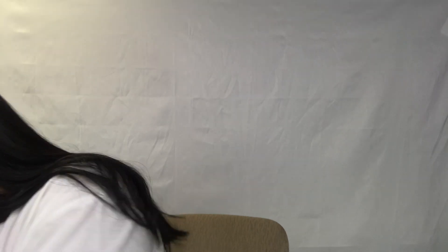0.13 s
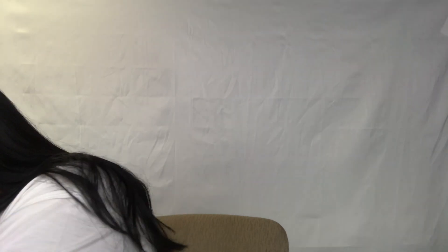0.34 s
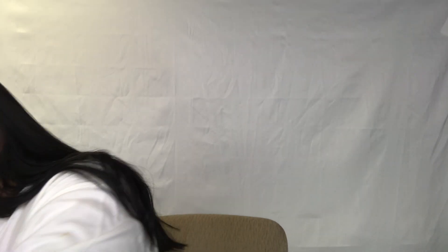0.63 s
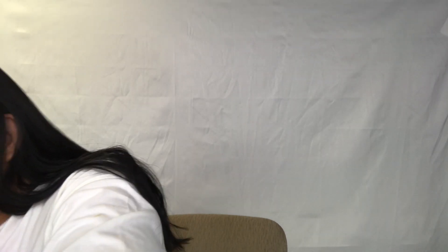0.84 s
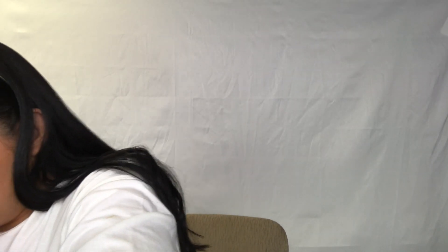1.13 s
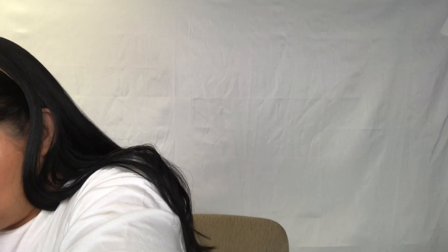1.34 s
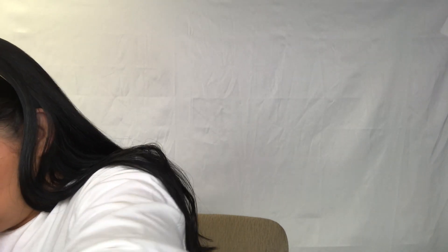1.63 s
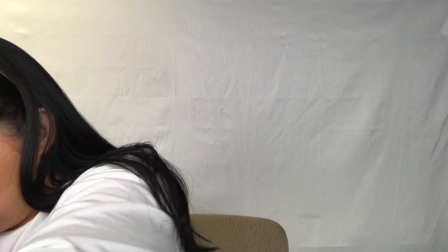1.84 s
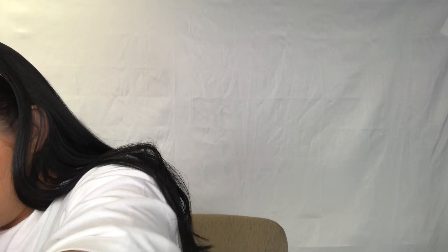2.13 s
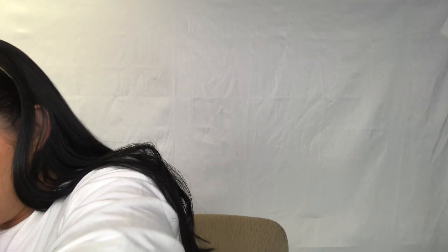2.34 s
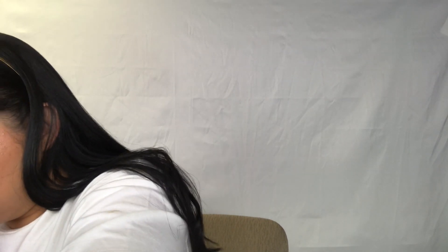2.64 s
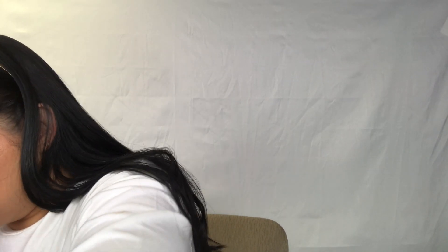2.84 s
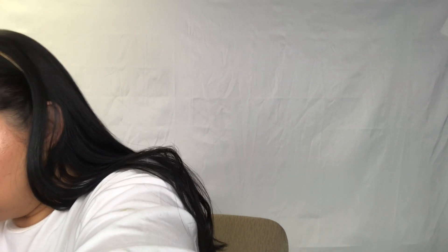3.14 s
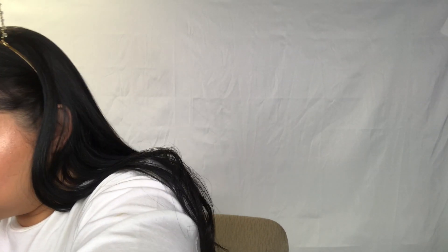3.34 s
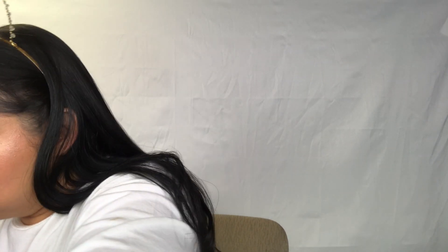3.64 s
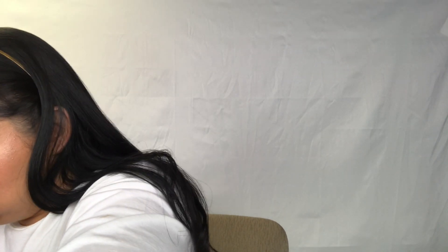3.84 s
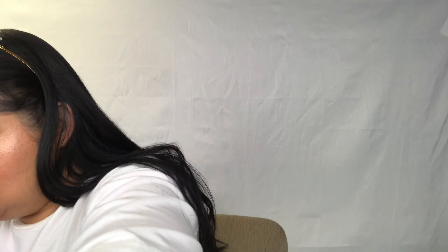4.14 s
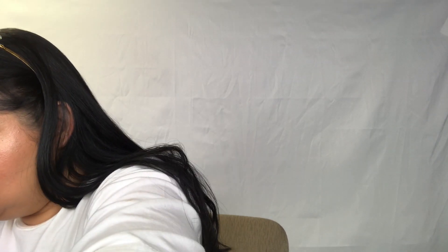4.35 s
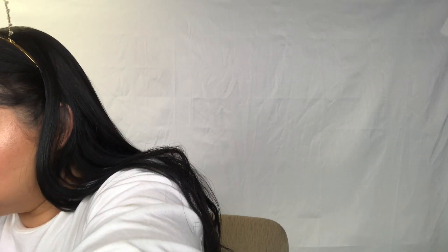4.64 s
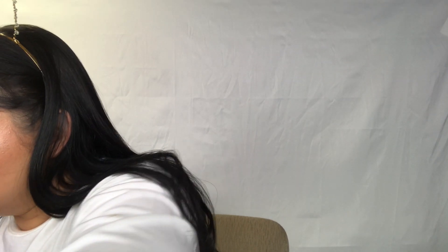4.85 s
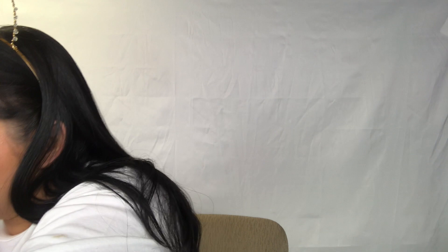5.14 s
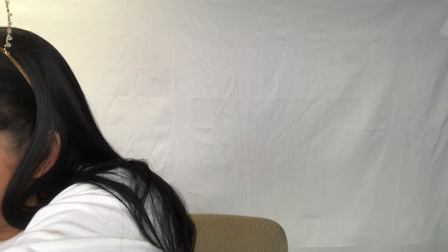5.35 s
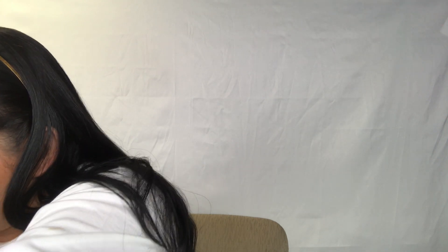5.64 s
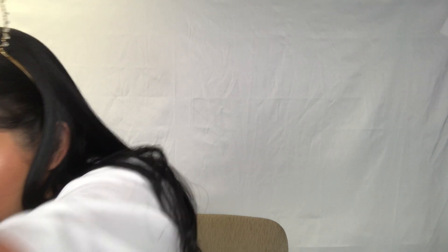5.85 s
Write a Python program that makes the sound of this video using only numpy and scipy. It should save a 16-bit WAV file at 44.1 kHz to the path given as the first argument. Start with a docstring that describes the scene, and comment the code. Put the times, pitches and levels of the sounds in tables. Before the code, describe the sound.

In a small, slightly echoing room, light plastic containers knock together, slide with brief dry chatter and land on a tabletop. The busiest and loudest rattle comes about a third of the way through; later contacts are sparser and softer, with a scratchy slide and low furniture bumps near the end. Low, steady air noise runs underneath, and the microphone is nearby.

```python
"""On a table in a small room, small plastic makeup cases are rummaged through, slid about and set down.
Each contact thuds in the table, rings the hollow case and its lid, and ticks at the hard edge.
Sliding cases chatter in random tiny slips, with a dry edge hiss; a few soft bumps boom in the furniture.
A diffuse tail and a floor-to-ceiling flutter follow every sound, over nearly steady ventilation noise."""
import sys
import numpy as np
from scipy import signal
from scipy.fft import rfft, irfft
from scipy.io import wavfile
from scipy.ndimage import uniform_filter1d

SR = 44100
rng = np.random.default_rng(int(sys.argv[2]) if len(sys.argv) > 2 else 0)


def to_wav(sig):
    """Store sig (one row per channel, or 1-D mono) as 16-bit WAV at the path in sys.argv[1].

    Samples outside -1..1 are clipped; the rate is SR.
    """
    pcm = np.clip(np.atleast_2d(sig), -1, 1) * 32767
    pcm = np.round(pcm).astype(np.int16)
    wavfile.write(sys.argv[1], SR, pcm.T)  # frames by channels


N = 264451
T = np.arange(N) / SR
RING_T = T[:SR // 3]

LEAD_IN_S = 0.012  # faint noise swells for this long before each impact
IMPACT = int(LEAD_IN_S * SR) + SR // 2000  # sample index of the impact
CASE_HZ, RESTING_CASE_HZ = 790, 583  # a case rings lower when it stands on the table
THUD_HZ = 329.4  # the table's answer to a blow in the pile of cases
EDGE_HZ, EDGE_T60_S = 4000, 0.025  # the faint tick that goes with a flat blow


def undb(db):
    """Decibels to gain."""
    return 10 ** (np.asarray(db) / 20)


def unit(x):
    """Scale to an rms of one."""
    return x / np.sqrt(np.mean(x ** 2))


def blow(x):
    """Scale a short sound to the energy of 10 ms at an rms of one."""
    return x / np.sqrt(np.sum(x ** 2) / (SR * 0.01))


def fade(t, t60_s):
    """Exponential decay, 60 dB down at t60_s."""
    return np.exp(-np.log(1000) * t / np.maximum(t60_s, 1e-4))


def add(out, start_s, x):
    """Mix x into out from start_s."""
    i = int(np.clip(start_s * SR, 0, N - 1))
    out[i:i + len(x)] += x[:N - i]


def colour(x, points):
    """Minimum-phase filter through (Hz, dB) points, built from the cepstrum of the log gain."""
    hz, db = np.transpose(points)
    size = 4096
    f = np.maximum(np.arange(size // 2 + 1) * SR / size, 1)
    gain = undb(np.interp(np.log(f), np.log(hz), db))
    cepstrum = irfft(np.log(gain))
    # fold onto positive time to make the response causal
    cepstrum[1:size // 2] *= 2
    cepstrum[size // 2 + 1:] = 0
    impulse_response = irfft(np.exp(rfft(cepstrum)))
    return signal.fftconvolve(x, impulse_response)[:len(x)]


def ring(modes):
    """Sum of exponentially damped sine modes (Hz, dB, t60 s), scaled as one blow."""
    total = np.zeros(len(RING_T))
    for hz, db, t60_s in modes:
        total += undb(db) * np.sin(2 * np.pi * hz * RING_T) * fade(RING_T, t60_s)
    return blow(total)


def resonate(x, hz, q):
    """Two-pole resonance at hz with quality q."""
    b, a = signal.iirpeak(np.clip(hz, 30, SR / 3), max(q, 0.8), fs=SR)
    return signal.lfilter(b, a, x)


def shell(force, hz, spread, q):
    """A heavily damped pair of resonances either side of hz, with a steep fall beyond them."""
    pair = resonate(resonate(force, hz / spread, q), hz * spread, q)
    band_hz = [hz * 0.48, min(hz * 1.45, SR / 3)]
    sos = signal.butter(3, band_hz, "bandpass", fs=SR, output="sos")
    return blow(signal.sosfilt(sos, pair))


def contact(chatter_db, chatter_t60_s):
    """Excitation of one contact: a faint noise lead-in, a sharp impact, then a brief noisy chatter."""
    size = len(RING_T)
    after_s = np.maximum(RING_T - LEAD_IN_S, 0)
    lead_in = blow(rng.standard_normal(size) * RING_T * (after_s == 0))
    swell = 1 - fade(after_s, 0.0024)
    chatter = blow(rng.standard_normal(size) * swell * fade(after_s, chatter_t60_s))
    impact = blow(signal.unit_impulse(size, IMPACT))
    return impact + undb(chatter_db) * chatter + undb(-17) * lead_in


def edge_tick(hz, t60_s, grit_db):
    """A close pair of edge modes rings from the instant of impact, with gritty noise beside it."""
    # spectrum of the grit: (frequency [Hz], relative level [dB])
    grit_spectrum = [(700, -55), (2000, -32), (3400, -14.5), (4700, 7), (7000, 2), (9000, -5),
                     (10500, -12.5), (12500, -8), (16000, -24)]
    pair = ring([(hz * 0.985, 0, t60_s), (hz * 1.03, -3, t60_s)])
    delayed = np.pad(pair, (IMPACT, 0))[:len(pair)]
    ping = blow(resonate(delayed, hz, 8.9))
    grit = blow(colour(contact(chatter_db=33, chatter_t60_s=0.0077), grit_spectrum))
    return blow(ping + undb(grit_db) * grit)


def knock(thud_db, body_db, lid_db, edge_db, chatter_db, grit_db,
          thud_hz=THUD_HZ, body_hz=CASE_HZ, edge_hz=EDGE_HZ, edge_t60_s=EDGE_T60_S):
    """One excitation drives case, lid and, slightly late, table; the hard edge ticks at impact."""
    force = contact(chatter_db, chatter_t60_s=0.024)
    thud_lag = int(0.0014 * SR)
    thud = shell(force, thud_hz, spread=0.81, q=1.99)
    thud = np.pad(thud, (thud_lag, 0))[:len(force)]
    body = shell(force, body_hz, spread=1.18, q=1.7)
    lid_hz = 2180 * (1 + 0.018 * rng.standard_normal())  # lids clack at much the same pitch
    lid = shell(force, lid_hz, spread=1.018, q=3.05)
    edge = edge_tick(edge_hz, edge_t60_s, grit_db)
    return undb(thud_db) * thud + undb(body_db) * body + undb(lid_db) * lid + undb(edge_db) * edge


def knocks():
    """Knocks of hollow cases, and one room echo: each has its own pitch; the edge tick follows the lid."""
    # (time [s], case level [dB], case pitch [Hz], lid clack [dB re case], table thud [dB re case])
    # the row at 0.879 s reinforces a room echo of the snap at 0.8445 s
    events = [(0.033, -30, 760, -15, -7), (0.087, -34, 700, -10, -5), (0.479, -15.5, 840, -13.5, -38),
              (0.511, -20.5, 770, -3.5, -6), (0.539, -25, 1010, -3, -1), (0.799, -25.5, 766, 2, -12),
              (0.8151, -16.5, 813, -22, -6), (0.826, -28.5, 800, 2, -12), (0.879, -28.5, 700, -13, 1.5),
              (1.065, -34, 580, -18, -5.5), (1.3064, -25.5, 1265, -6, -32), (1.308, -24, 674, -38, -11.5),
              (1.4934, -36.5, 1350, -3, -4), (1.495, -28.5, 537, -20, -6), (1.799, -27, 990, -0.5, -12),
              (1.9685, -15.5, 700, -12, -17), (1.978, -12, 760, -11, -18.5), (1.999, -14.5, 915, -4, -20),
              (2.03, -15.5, 735, -21, -22), (2.051, -37, 910, -24, 0), (2.056, -12.5, 886, -22, -7.5),
              (2.065, -18, 800, -7.5, -9), (3.68, -27.5, 900, -3.5, -9), (3.695, -21, 920, -10, -24),
              (3.708, -23.5, 850, -22, -10), (3.8354, -22, 910, -7, -10), (3.856, -21, 796, -4.5, -6.5),
              (3.924, -32, 890, -2.5, 1.5), (3.994, -37, 1010, 2, -3), (4.157, -46.5, 660, -1, -16),
              (5.278, -26.5, 700, -25, 0), (5.417, -37.5, 890, -6, -1), (5.497, -37.5, 920, -13, 4),
              (5.703, -38, 590, -8, -11)]
    out = np.zeros(N)
    for time_s, case_db, case_hz, lid_re_db, thud_re_db in events:
        lid_db = case_db + lid_re_db
        # lighter contacts chatter more
        sound = knock(case_db + thud_re_db, case_db, lid_db, lid_db - 17,
                      chatter_db=-2 - 0.1 * case_db, grit_db=0, body_hz=case_hz)
        add(out, time_s - LEAD_IN_S, sound)
    return out


def set_downs():
    """Cases land or rock on the table: the tabletop thuds under the resting case and its lid."""
    # (time [s], thud level [dB], thud pitch [Hz], hollow body [dB re thud], lid clack [dB re thud])
    events = [(1.7443, -25.5, 390, -17, 5.5), (1.763, -25.5, 400, -0.5, -10), (1.773, -34, 382, -6, -18),
              (1.791, -18, 382, -9, -10.5), (1.803, -23.5, 264, -1.5, -7), (1.836, -22, 253, -6, -36),
              (1.852, -33, 231, -3, -29), (2.292, -21, 274, -9, -11), (2.312, -24, 333, -19, -34),
              (2.339, -25, 262, -9.5, -37), (2.372, -34.5, 213, 1, -6), (2.498, -39, 174, -0.5, -15),
              (2.704, -22, 233, 2, -31), (2.755, -42, 225, -20, -11), (2.878, -39, 236, -8, -13),
              (3.133, -42, 194, 2.5, -10), (3.708, -31.5, 197, -4, 2), (3.7631, -27, 350, -3, -4),
              (4.733, -39, 148, 9, -4), (4.764, -39.5, 149, -4, -6.5), (5.676, -38.5, 301, 1.5, -17),
              (5.764, -37, 218, -21, -24), (5.867, -28.5, 330, -11, -17), (5.923, -35, 223, -14, -25)]
    out = np.zeros(N)
    for time_s, thud_db, thud_hz, body_re_db, lid_re_db in events:
        lid_db = thud_db + lid_re_db
        sound = knock(thud_db, thud_db + body_re_db, lid_db, lid_db - 23.5,
                      chatter_db=1 - 0.1 * thud_db, grit_db=6, thud_hz=thud_hz, body_hz=RESTING_CASE_HZ)
        add(out, time_s - LEAD_IN_S, sound)
    return out


def clicks():
    """Snaps of hard edges, and one room echo: a bright ping with grit, over lid, case and table."""
    # (time [s], edge level [dB], edge pitch [Hz], ring t60 before the edge resonance [s],
    #  case behind the edge [dB re edge], grit [dB re ping])
    # the row at 0.877 s reinforces a room echo of the snap at 0.8445 s
    events = [(0.01, -53.5, 7800, .012, 14.5, 3), (0.5306, -32, 5470, 0.0065, 8, 2),
              (0.5743, -39.5, 6370, 0.0069, -1, 1), (0.792, -25.5, 6960, 0.017, 8, 1.5),
              (0.8445, -23, 5290, 0.018, -0.5, -0.5), (0.877, -30, 5210, 0.022, 4, -19),
              (1.307, -40, 4090, 0.017, 6.5, -27), (1.7715, -34, 6100, 0.0036, 3, -8),
              (1.7864, -32.5, 5030, .008, 4, 12), (1.948, -37.5, 3180, 0.022, 4, -23),
              (1.969, -43, 4060, .012, -4, 14), (1.9916, -19.5, 4580, 0.044, -0.5, 4),
              (2.005, -26, 4770, 0.054, 6.5, 14), (2.05, -36, 7500, 0.011, 0, -2),
              (3.679, -38.5, 6050, 0.014, 10, -4), (3.857, -42, 7170, .01, 11, 1),
              (5.142, -38.5, 7100, 0.049, 3, -11), (5.163, -36, 6700, .012, 11, 8),
              (5.207, -39, 4370, .013, 2, -16), (5.23, -42, 5560, .013, 1, -12),
              (5.245, -37.5, 4800, 0.0091, -7, -17), (5.514, -45.5, 3900, .012, 3, 2),
              (5.831, -44.5, 5060, .012, -4, 15)]
    out = np.zeros(N)
    for time_s, edge_db, edge_hz, t60_s, case_re_db, grit_db in events:
        behind_db = edge_db + case_re_db
        sound = knock(behind_db - 10.5, behind_db - 5, behind_db, edge_db,
                      chatter_db=1.5, grit_db=grit_db, edge_hz=edge_hz, edge_t60_s=t60_s)
        add(out, time_s - LEAD_IN_S, sound)
    return out


def friction(t, slips_per_s, hiss_db, tilt_db_per_octave):
    """Uneven tiny slips at random instants ring the cases; their sharp edges add a dry hiss."""
    # case and edge spectra: (frequency [Hz], relative level [dB])
    rub_spectrum = [(40, -75), (100, 0.5), (150, -9), (300, -4), (420, 3), (600, 6), (1150, -2), (1450, -1),
                    (2000, -2.5), (2600, -2), (3400, -21), (6000, -53.5)]
    scrape_spectrum = [(1500, -66), (3200, 6), (4500, 2.5), (6000, 4.5), (7300, -0.5), (9000, -5.5),
                       (10500, -8), (12500, -6.5), (16000, -15)]
    size = len(t)
    slip_gain = undb(4.5 * rng.standard_normal(size).clip(-2, 2))
    slipping = rng.random(size) < slips_per_s / SR
    slips = slipping * rng.choice([-1, 1], size) * slip_gain
    body = unit(colour(slips, rub_spectrum))
    # each slip starts a short burst of noise
    grit = signal.fftconvolve(slips, fade(RING_T, 0.008))[:size] * rng.standard_normal(size)
    tilted = [(hz, db + tilt_db_per_octave * np.log2(hz)) for hz, db in scrape_spectrum]
    hiss = unit(colour(grit, tilted))
    return body + undb(hiss_db) * hiss


def strokes():
    """Pushed cases brush, grip, swell and die away; louder strokes slip faster, and the hiss recedes."""
    # (start [s], length [s], swell [s], body level after the swell [dB],
    #  edge hiss at the start [dB re body], hiss tilt [dB/octave])
    events = [(0.0, 0.19, 0.0037, -48.5, -6.5, 3), (0.748, 0.13, 0.037, -24.5, -4.5, -5.5),
              (1.059, .12, 0.013, -48, -4.5, 1), (1.963, 0.081, 0.004, -23, -2, 4.5),
              (2.239, 0.15, 0.019, -44, -30, 0), (3.18, .2, 0.082, -43.5, -10, -1),
              (3.682, 0.012, .004, -35, -21, 1), (3.833, 0.056, 0.0087, -36.5, -15, -2),
              (5.123, 0.18, 0.1, -29, -2, -0.5), (5.387, 0.17, 0.0076, -44, -7, 3),
              (5.669, 0.93, 0.0083, -47, -10, -1)]
    brush_s, brush_db = 0.02, -13  # the fingers brush a case before it starts to move
    grip_s, swell_db, release_t60_s = 0.0022, 7, 0.18
    out = np.zeros(N)
    t = T[:SR // 2] - brush_s  # every stroke is cut 0.48 s after its start
    for start_s, length_s, swell_s, level_db, hiss_start_db, tilt_db_per_octave in events:
        grip_curve_db = np.interp(t, [0, grip_s], [brush_db, 0])
        swell_curve_db = np.interp(t, [0, max(swell_s, 1e-3)], [-swell_db, 0])
        release = fade(np.maximum(t - length_s, 0), release_t60_s)
        pressure = undb(level_db + grip_curve_db + swell_curve_db) * release
        slips_per_s = 3600 * 2 ** (level_db / 15)  # doubles every 15 dB
        hiss_db = hiss_start_db - 15 * np.clip(t / length_s, 0, 1)
        rub = friction(t, slips_per_s, hiss_db, tilt_db_per_octave)
        add(out, start_s - brush_s, pressure * rub)
    return out


def tabletop(x):
    """The table and the things on it ring along with every contact, and radiate little deep bass."""
    # (frequency [Hz], relative level [dB], t60 [s])
    modes = [(151, 3.5, 0.16), (196, -0.5, 0.47), (271.6, -2.5, 0.45), (411, -5.5, 0.059),
             (610, -1.5, 0.041), (720, -12, 0.3), (940, 3, 0.13), (1037, -1, 0.067), (1103, 1, 0.051),
             (1270, -24, 0.054), (1553, -11, 0.12), (2200, -23, 0.16), (2460, -13, 0.05), (4620, 3, 0.066)]
    x = signal.sosfilt(signal.butter(2, 90, "highpass", fs=SR, output="sos"), x)
    ringing = np.zeros(N)
    for hz, db, t60_s in modes:
        q = np.pi * hz * t60_s / np.log(1000)
        ringing += undb(db) * resonate(x, hz, q)
    return x + undb(1.5) * ringing


def bumps():
    """Soft, dull bumps excite low furniture modes that swell in and boom briefly."""
    # (time [s], level before the soft onset [dB])
    events = [(4.735, -35), (4.811, -41), (5.678, -40.5)]
    # (frequency [Hz], relative level [dB], t60 [s])
    furniture_modes = [(76, 6.3, 0.57), (153.7, 2, 1)]
    out = np.zeros(N)
    boom = ring(furniture_modes) * (1 - fade(RING_T, 0.044))
    for time_s, db in events:
        add(out, time_s, undb(db) * boom)
    return out


def room(x):
    """A short diffuse tail, and a flutter between floor and ceiling that is strongest in the treble."""
    # diffuse tail: (frequency [Hz], relative level [dB], t60 [s])
    tail_bands = [(101, 7, 0.11), (253, 0, 0.42), (700, -2, 0.21), (1940, -5, 0.27), (5040, -1.5, 0.21),
                  (14000, -8, .19)]
    # first floor-to-ceiling echo: (frequency [Hz], level [dB re direct])
    echo_spectrum = [(300, -9), (900, -9.5), (2000, -10.5), (5000, -8.5), (14000, -6)]
    ceiling_s, trip_loss_db = 0.01667, 3.6
    t = T[:SR // 2]
    hz, db, t60_s = np.transpose(tail_bands)
    noise = rfft(rng.standard_normal(len(t)))
    log_f = np.log(np.maximum(np.arange(len(noise)) * SR / len(t), 1))
    tail = np.zeros(len(t))
    for band, level_db, decay_s in zip(np.eye(len(hz)), db, t60_s):
        # overlapping triangular bands on a log frequency axis
        band_noise = irfft(noise * np.interp(log_f, np.log(hz), band), len(t))
        shape = fade(t, decay_s) * (1 - fade(t, 0.0044))
        tail += undb(level_db) * band_noise * shape / np.linalg.norm(shape)
    flutter = np.zeros(len(t))
    for trip in range(1, 10):
        flutter[round(trip * ceiling_s * SR)] = undb(-trip_loss_db * (trip - 1))
    return x + signal.fftconvolve(x, tail + colour(flutter, echo_spectrum))[:N]


def walk(steps_per_s):
    """Slow random wavering with a spread near one: random steps smoothed by a moving average."""
    k = int(SR / steps_per_s)
    steps = np.repeat(rng.standard_normal(N // k + 1), k)
    return unit(uniform_filter1d(steps, k)[:N])


def ventilation():
    """Air noise: filtered random noise whose level wavers slightly."""
    # (frequency [Hz], relative level [dB])
    air_spectrum = [(12, -94), (20, -38), (77, 2), (182, -6), (216, 0.5), (293, -7.5), (337, -3),
                    (446, -11.5), (485, -2), (642, -6.5), (1370, -19), (2530, -20), (16000, -37.5)]
    level_db = -43.5 + 0.5 * walk(1.88)
    return undb(level_db) * unit(colour(rng.standard_normal(N), air_spectrum))


def scene():
    """Handling sounds and furniture bumps in the room, over the air noise."""
    handling = knocks() + set_downs() + clicks() + strokes()
    return (room(tabletop(handling) + bumps()) + ventilation())[None]


def record(dry):
    """The microphone rounds the loudest peaks (tanh) and cuts the top with a steep low-pass."""
    top_hz = 15900
    sos = signal.ellip(10, 0.2, 80, top_hz, fs=SR, output="sos")
    return signal.sosfilt(sos, np.tanh(dry))


dry = scene()
out = record(dry)
to_wav(out)
```